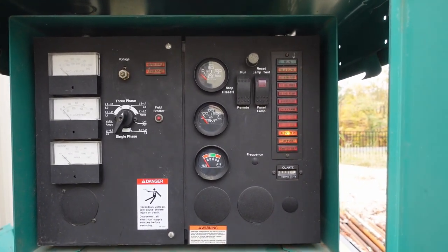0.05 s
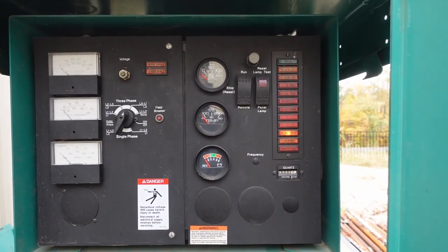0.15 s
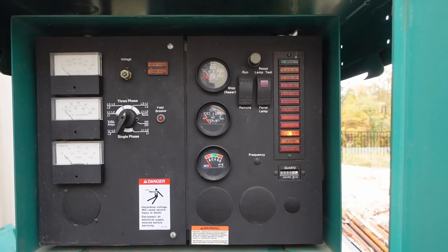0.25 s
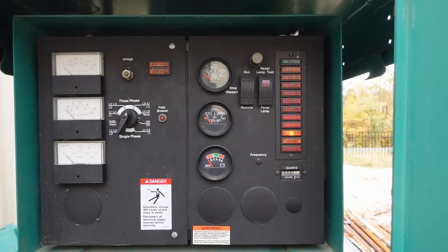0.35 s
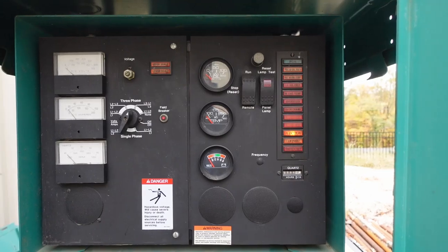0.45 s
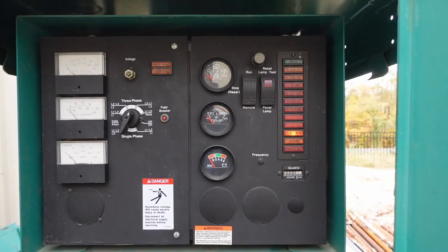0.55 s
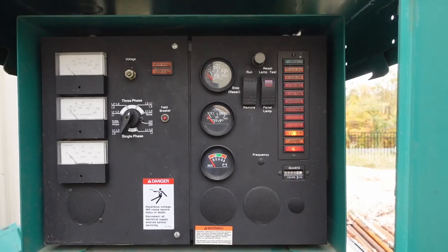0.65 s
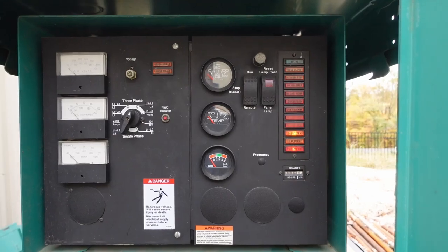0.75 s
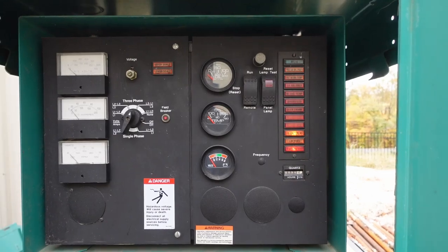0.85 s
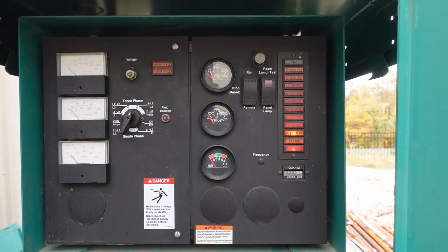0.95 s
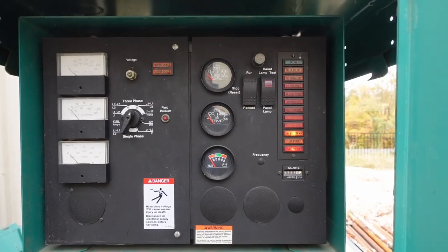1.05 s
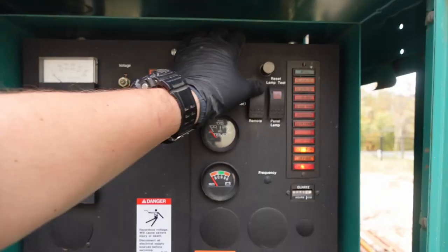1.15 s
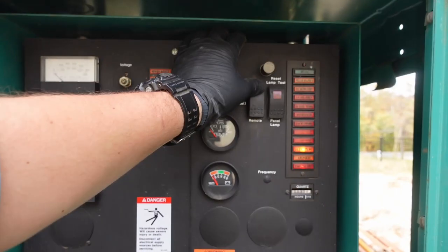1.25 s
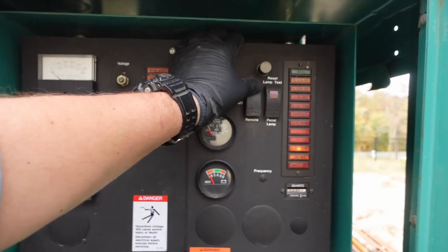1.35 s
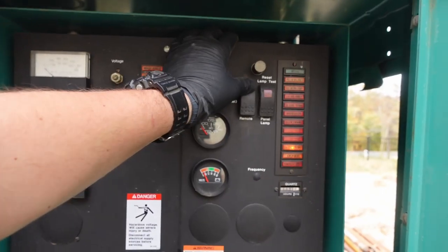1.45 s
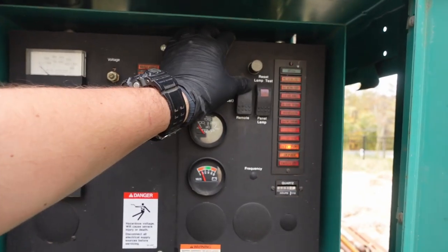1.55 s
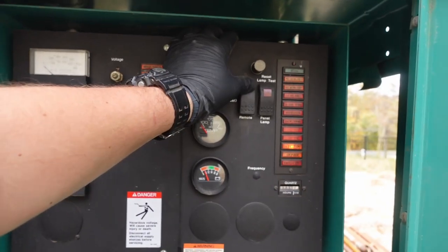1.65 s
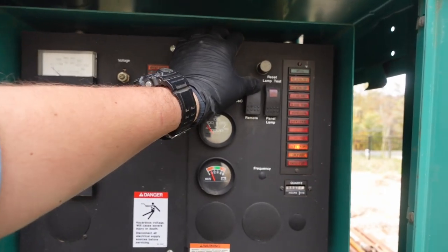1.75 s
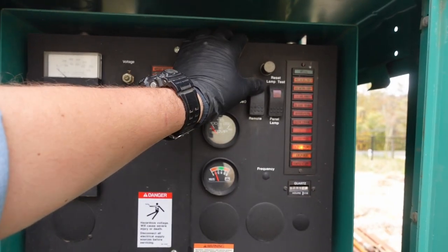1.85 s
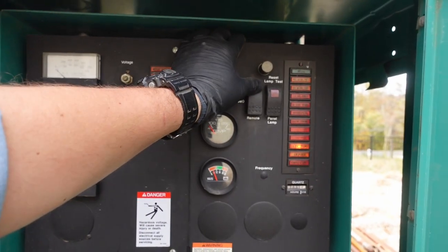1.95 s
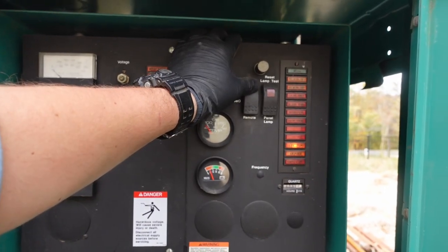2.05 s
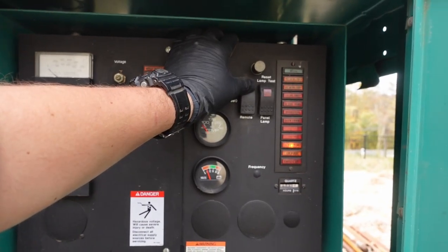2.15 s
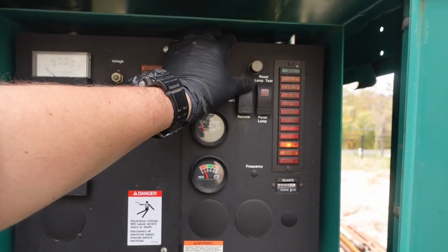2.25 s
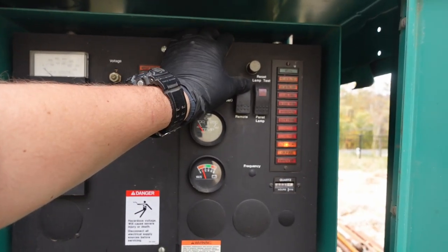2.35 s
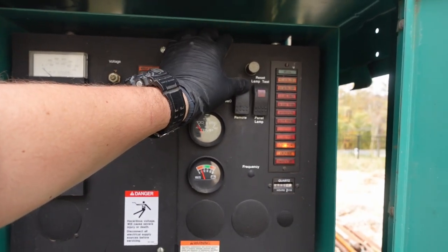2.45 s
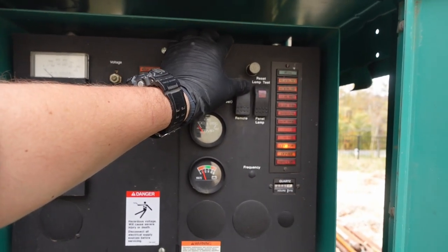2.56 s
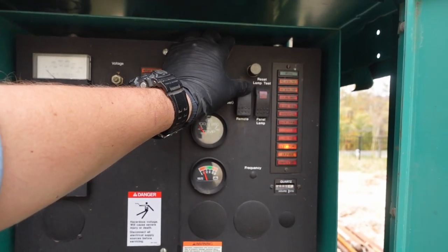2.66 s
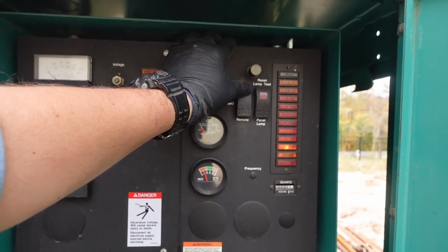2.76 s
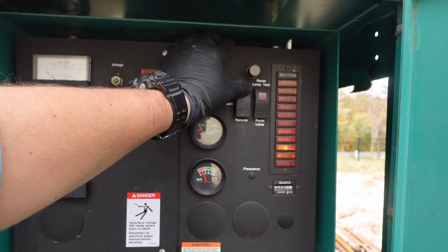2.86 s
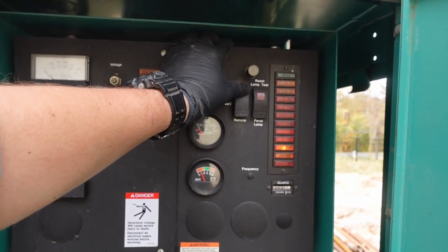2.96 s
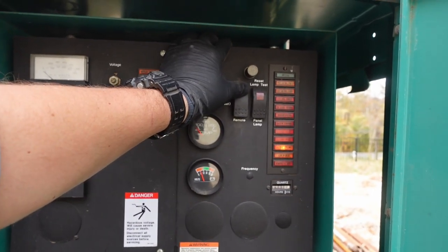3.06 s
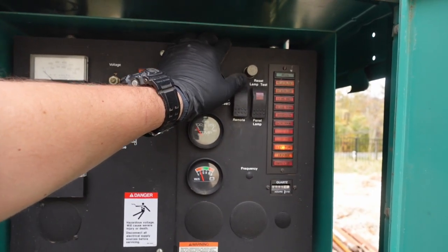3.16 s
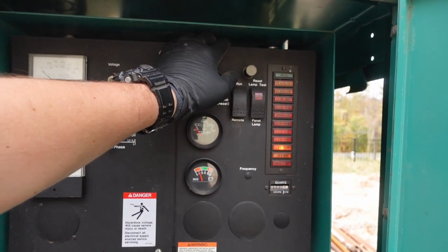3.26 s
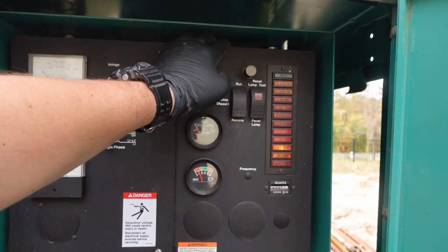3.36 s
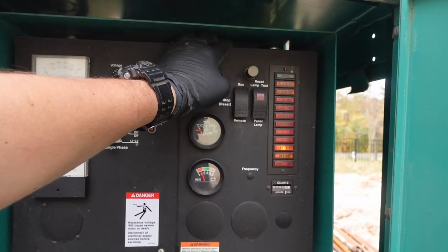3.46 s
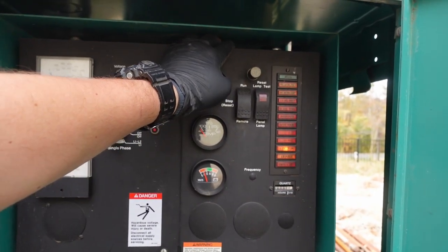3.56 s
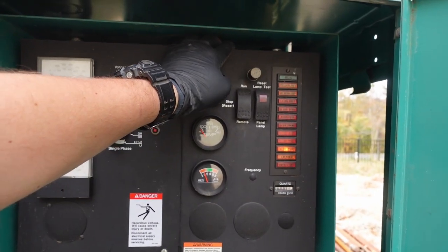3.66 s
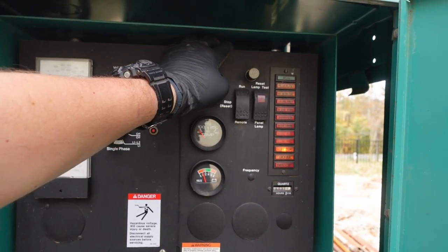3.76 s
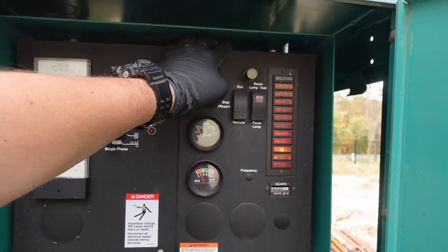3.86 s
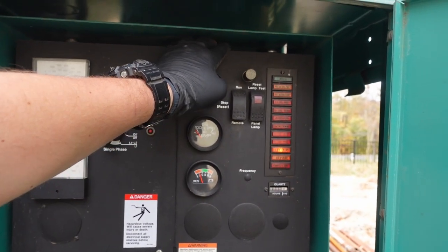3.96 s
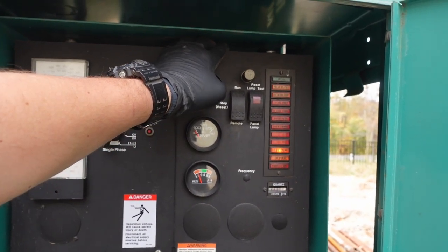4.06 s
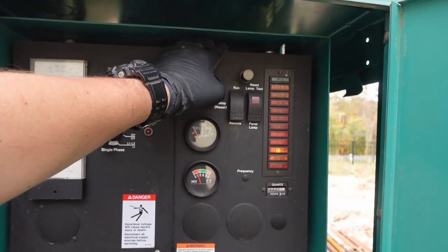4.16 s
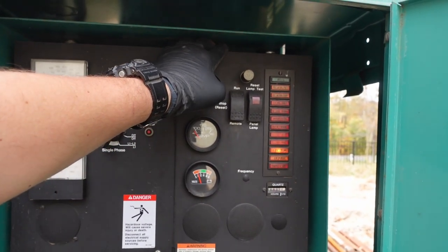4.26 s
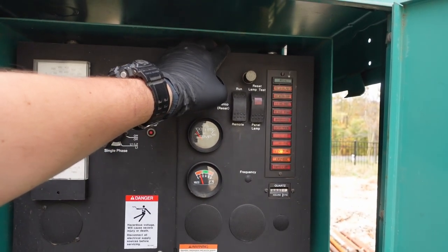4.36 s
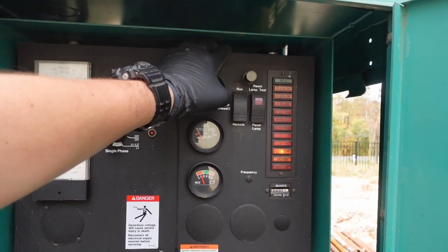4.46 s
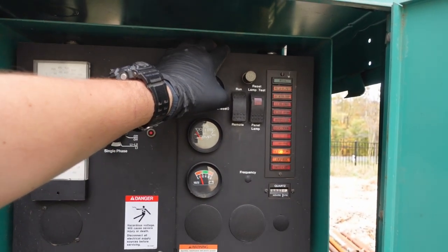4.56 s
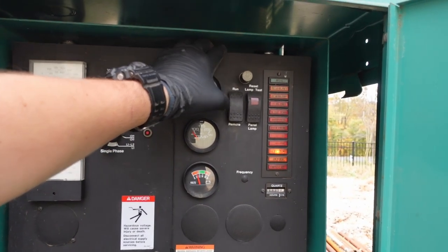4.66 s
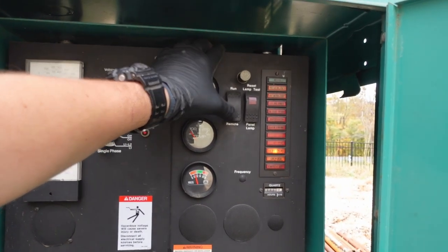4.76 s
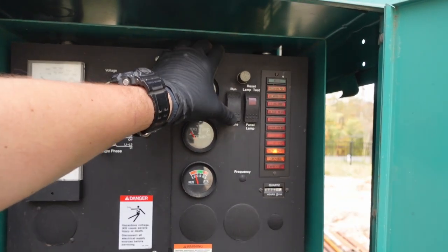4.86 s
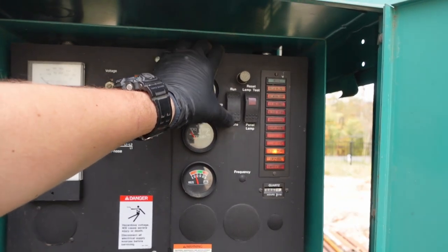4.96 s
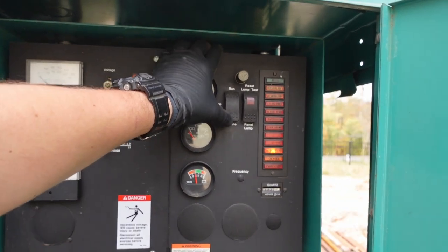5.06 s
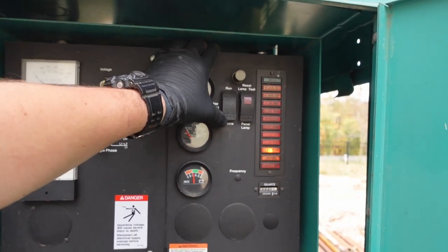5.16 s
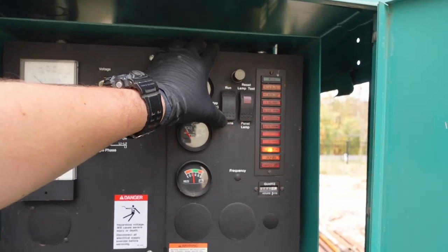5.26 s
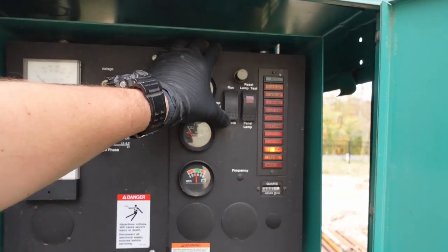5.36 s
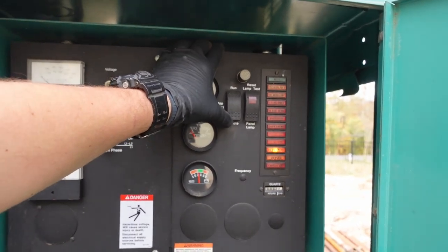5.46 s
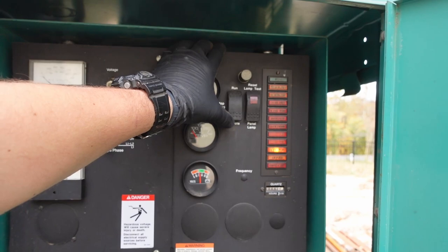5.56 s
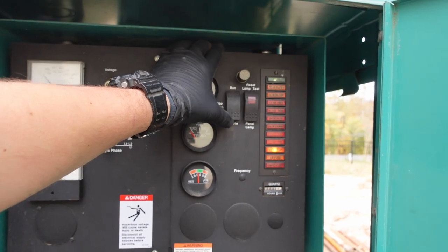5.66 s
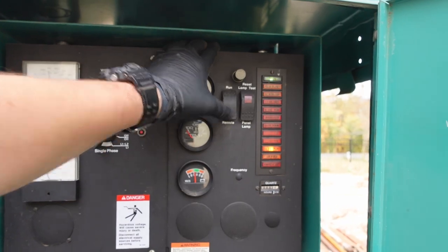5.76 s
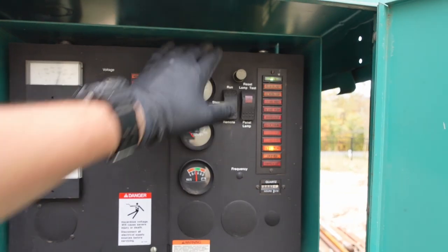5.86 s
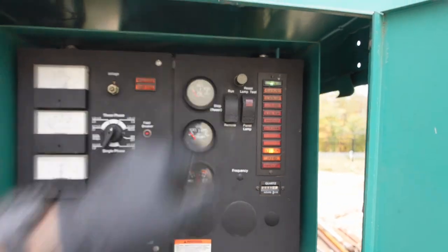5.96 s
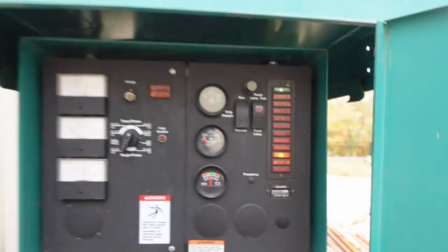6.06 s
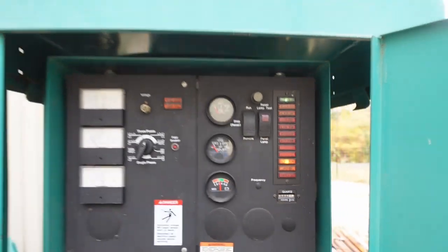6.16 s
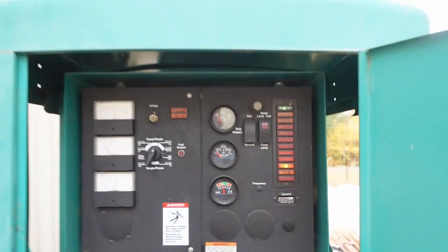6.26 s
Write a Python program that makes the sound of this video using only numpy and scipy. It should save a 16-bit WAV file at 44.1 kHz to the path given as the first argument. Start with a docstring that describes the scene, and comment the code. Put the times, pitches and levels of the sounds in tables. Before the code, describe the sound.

A relay clicks, a starter slams in and grinds with a pulsing metallic churn, then a diesel generator engine catches and revs up loudly.

```python
"""The geared starter of a standby generator grinds outdoors, close at the open control panel.
A relay clicks, then the pinion slams in; noise bursts at the tooth rate ring the steel housing,
hardest under each compression. The engine outruns the starter, whose freewheel chatters and drops out.
Firing-rate noise and tones make exhaust, clatter, injectors and fan as the engine runs up.
Shaped noise gives a wash like distant traffic, stepping at once to a louder, duller one before the start."""
import sys
import numpy as np
from scipy import signal
from scipy.fft import rfft, irfft
from scipy.io import wavfile

SR = 44100
rng = np.random.default_rng(int(sys.argv[2]) if len(sys.argv) > 2 else 0)


def dump_mix(stems):
    """Bounce the given channels to the path in sys.argv[1] as a 16-bit WAV at rate SR."""
    frames = np.atleast_2d(stems).T  # one column per channel
    limited = np.clip(frames, -1, 1)  # hard clip at full scale
    pcm = np.round(limited * 32767).astype(np.int16)
    wavfile.write(sys.argv[1], SR, pcm)


N = 278659
T = np.arange(N) / SR  # time of each sample, s
FILTER_HZ = np.fft.rfftfreq(8192, 1 / SR)

# starter speed, from heaving and cranking to racing and coasting: time_s, armature_turns_per_s
STARTER_SPEED = [(1.335, 60), (1.41, 120), (1.55, 125), (1.69, 144), (1.83, 165), (2.13, 202), (4.45, 209),
                 (4.65, 250), (5.03, 281), (6.32, 183)]
# starter and flywheel housing modes: mode_hz, width_hz, level_db
HOUSING_MODES = [(270.5, 28, -7), (940, 17.4, -8), (1028, 26.6, -1), (1125, 19.6, 0.5), (1226, 22, -3),
                 (1252, 11, -2), (1390, 14, -20), (2185, 73, -5)]
# steel enclosure resonances: centre_hz, width_hz, lift_db
PANEL_RESONANCES = [(120, 14, 3.5), (208, 48, 6), (271.3, 23.6, 10), (449.6, 39, 7.5), (538, 9.5, 8.5),
                    (616.3, 7.4, 9), (794, 25, 3.5), (1579, 6.7, 6.5), (1638, 11.5, 9.5), (1860, 31, -4),
                    (1905, 26, 8), (3297, 104, 5.5), (4370, 35, 7), (5060, 80, 5), (6350, 21, 9.5),
                    (6530, 50, -2), (9360, 170, 6)]
# spectrum of the gears grinding under load: frequency_hz, density_db_per_hz
GRIND_SPECTRUM = [(25, -74), (55, -45), (90, -23), (160, -8), (400, -3.5), (750, -1.5), (1150, 3.5),
                  (1500, -3), (2400, -4.5), (3600, -9.5), (6500, -18.5), (9500, -25.5), (11500, -33),
                  (16000, -48)]
# spectrum of the gear rattle: frequency_hz, density_db_per_hz
RATTLE_SPECTRUM = [(25, -53), (50, -20), (80, -14.5), (130, -2.5), (270, -1), (800, 2), (1300, 2.5),
                   (1700, -7), (2400, -3.5), (3600, -10), (6500, -15), (9500, -26), (11500, -30),
                   (16000, -45)]
# whine of the loaded reduction gears: multiple_of_tooth_rate, level_against_torque_db
GEAR_WHINE = [(1.05, -11), (4.15, -2), (7.85, -8.5)]
# overtones of the racing armature: multiple_of_turning_rate, level_against_hum_db
ARMATURE_OVERTONES = [(2, -2), (3, 3.5), (8.3, -2.5)]
# spectrum of the slipping freewheel: frequency_hz, density_db_per_hz
SLIP_SPECTRUM = [(200, -37), (700, 9), (1600, -1), (2300, 3.5), (3500, -5.5), (4800, -3), (6600, -4.5),
                 (7600, -10.5), (9600, -12.5), (11500, -22.5), (16000, -33)]
# engine speed: time_s, firings_per_s
ENGINE_SPEED = [(4.8, 16.4), (5.1, 31.1), (5.3, 49.5), (5.5, 65.6), (5.6, 70.7), (5.8, 76.6), (6.0, 80),
                (6.32, 83.4)]
# low engine orders: multiple_of_firing_rate, level_against_exhaust_db
ENGINE_ORDERS = [(1, -24.5), (2, -12.5), (2.5, -15), (3, -28), (4, -17), (5, -16), (5.5, -12), (6.5, -19)]
# spectrum of the exhaust puffs: frequency_hz, density_db_per_hz
EXHAUST_SPECTRUM = [(25, -43), (55, -29), (75, -23), (105, -7), (165, 0), (240, 5), (320, 1), (430, 2),
                    (600, -1), (1000, -14.5), (1500, -23), (4000, -51)]
# spectrum of the engine knock: frequency_hz, density_db_per_hz
CLATTER_SPECTRUM = [(200, -19), (700, 4), (1200, 3.5), (1600, -1), (2300, -3.5), (4000, -13), (6000, -14),
                    (8000, -16.5), (11000, -29), (16000, -50)]
# spectrum of the injector ticks: frequency_hz, density_db_per_hz
INJECTOR_SPECTRUM = [(2000, -40), (4500, -3), (5800, 1.5), (7500, -5), (8700, -4), (9600, -6.5),
                     (10300, -15), (16000, -28)]
# ring of the injectors and fuel lines: centre_hz, width_hz, lift_db
FUEL_LINE_RESONANCES = [(5850, 300, 0.5), (7380, 246, 4.5), (8600, 200, 8), (9450, 200, 2)]
# switchgear and pinion blows: start_s, level_db, ring_t60_s, low_thud_share_db
SWITCH_BLOWS = [(.622, -52, .07, -30), (1.2959, -24, 0.028, -20), (1.3, -44.5, 0.24, -10),
                (1.328, -26.5, 0.16, -10), (1.345, -20.5, 0.14, 5.5), (1.365, -27, 0.1, 19.5)]
# spectrum of the sharp metal contacts: frequency_hz, density_db_per_hz
CLACK_SPECTRUM = [(150, -15), (600, -5), (1900, -5.5), (2600, 0), (3400, -5), (4500, -5.5), (6200, -8),
                  (10000, -15), (16000, -33)]
# ring of the relay and solenoid: centre_hz, width_hz, lift_db
CONTACT_RESONANCES = [(1900, 140, 9), (3410, 160, 8.5), (5760, 450, 5), (9000, 390, 4.5)]
# spectrum of the heavy blows: frequency_hz, density_db_per_hz
THUD_SPECTRUM = [(40, -41), (100, -14), (250, -1.5), (700, -0.5), (1050, 10), (1500, 0), (3000, -5),
                 (9000, -45)]
# spectrum of the yard wash at first: frequency_hz, density_db_per_hz
YARD_SPECTRUM = [(25, -32), (60, -18), (100, -13), (125, -1.5), (190, -10.5), (400, -12), (600, -7.5),
                 (850, -2.5), (1300, -4.5), (1800, -12), (3000, -28), (4500, -33.5), (8000, -39),
                 (15000, -45)]
# spectrum of the second, louder and duller wash: frequency_hz, density_db_per_hz
SECOND_WASH_SPECTRUM = [(25, -37), (100, -17), (180, -16), (310, -20), (520, -10), (750, -13), (1100, -11),
                        (1700, -24), (2600, -33), (6000, -46), (15000, -57)]

# the starter engages, is outrun by the engine, drops out and winds down
ENGAGE_S, OUTRUN_S, DROP_OUT_S, COAST_S = 1.335, 4.347, 5.035, 5.18
INRUSH_S = 0.48  # decay time of the surge of starting torque
# compression strokes: the gap settles as the flywheel gathers speed, then creeps shorter
FIRST_STROKE_S, STROKE_GAP_S, CREEP_S = 1.8035, .1396, .00034
SLOW_START_S, SETTLE_STROKES = .023, 1.2
STROKE_DB, FIRST_STROKE_DB, LOADED_SHARE = -17.5, -20.5, .525
SAG_SHARE = .14  # share of its speed the starter loses per unit of sag
TEETH_PER_TURN = 2.25  # tooth impacts per armature turn
# starter layers: cranking_db, surge_db, free_db, coast_db_per_s
GEAR_LEVELS = (-28.5, 3.5, -2, 14)
BELL_LEVELS = (-29.5, 9.5, 6, 15.5)
ARMATURE_LEVELS = (-40, -13, 2, 30)
# the first slow compression swells the ring and rattle: centre_s, half_length_s, ring_lift_db, rattle_lift_db
HEAVE = (1.665, 0.081, 8.9, 2.9)
# the hum swells as it passes a panel resonance: centre_hz, width_hz, lift_db
HUM_PANEL = (274, 20.5, 13.1)
# the pinion squeals as it takes up the load: centre_s, half_length_s, level_db
SQUEAL = (1.41, 0.016, -21)
SHRIEK_DB, SHRIEK_PER_TURN, SHRIEK_END_S = -33.5, 17.6, 1.906
# the freewheel chatters louder the longer it is outrun
SLIP_DB, SLIP_DB_PER_S, SLIP_RELEASE_S = -32, 12, 0.039
FULL_RATE = 82  # firings per s at which the engine levels below are given
# engine layers: level_at_full_rate_db, rise_db_per_extra_firing_per_s
EXHAUST_LAW, CLATTER_LAW = (-14.5, 0.16), (-27, 0.18)
TICK_LAW, FAN_LAW = (-38, 0.14), (-12.5, 0.74)
FIRST_FIRE_DB, FIRST_FIRE_S = -32, 5.02  # the first firings knock hard in the cold cylinders
# the microphone backs out of the panel recess and hears more treble and clatter: start_s, length_s, lift_db
BACK_OUT = (6.15, .15, 3.2)
YARD_DB, SECOND_WASH_DB = -55, -49.5
EDGE_HZ = 15900  # upper band limit of the recorder


def starter():
    """Gear teeth knock the housing and enclosure, hardest and slowest under compression."""
    spin = curves(STARTER_SPEED)[0]
    torque, sag = load()
    heave_s, half_length, ring_lift_db, rattle_lift_db = HEAVE
    heave = swell(heave_s, half_length)
    rattle_db = starter_level(*GEAR_LEVELS) + rattle_lift_db * heave
    ring_db = starter_level(*BELL_LEVELS) + ring_lift_db * heave
    tooth_rate = TEETH_PER_TURN * spin * (1 - SAG_SHARE * sag) * (1 + .006 * wander(60))
    teeth = np.cumsum(tooth_rate) / SR
    impacts = teeth + .2 * wander(200) + 1  # backlash lets each tooth land early or late
    rattle_noise = bursts(impacts, decay=0.54, uneven_db=2.5, bed=0.75)
    rattle = amp(rattle_db) * colour(rattle_noise, RATTLE_SPECTRUM, PANEL_RESONANCES)
    grind_noise = torque * bursts(impacts, decay=0.98, uneven_db=1.5, bed=0.54)
    grind = amp(-2.5) * colour(grind_noise, GRIND_SPECTRUM, PANEL_RESONANCES)
    bell = housing_bell()
    knocks = (amp(ring_db) + amp(-6.5) * torque) * bursts(impacts, decay=0.13, uneven_db=4.5, bed=0.52)
    ring = signal.oaconvolve(knocks, bell / np.linalg.norm(bell))[:N]
    whine = gear_whine(teeth, torque, sag)
    return fade_in(ENGAGE_S + .01, .03) * (enclosure(rattle + grind, t60=.08, wet_db=-11) + ring + whine)


def housing_bell():
    """The decaying modes with which the housing rings on between the blows."""
    t = T[:SR // 4]
    bell = 0
    for hz, width, db in HOUSING_MODES:
        bell = bell + amp(db) * np.exp(-np.pi * width * t) * np.cos(2 * np.pi * hz * t)
    band = signal.butter(2, [130, 2600], "bandpass", fs=SR, output="sos")
    return signal.sosfilt(band, bell)


def gear_whine(teeth, torque, sag):
    """Loaded reduction gears whine at multiples of the tooth rate, falling in pitch as the sag grows."""
    whine = 0
    for multiple, db in GEAR_WHINE:
        flutter = 1 + .45 * wander(90)
        whine = whine + amp(db) * flutter * np.sin(2 * np.pi * multiple * teeth + .6 * wander(80))
    return whine * torque * np.exp(-sag)


def load():
    """Torque on the starter: it bites at each compression and eases past top dead centre."""
    torque, sag = np.zeros(N), np.zeros(N)
    for start_s, force_db, held_s in strokes():
        age = np.maximum(T - start_s, 0)
        grip = np.minimum(age / .014, 1) * np.exp(-np.maximum(age - held_s, 0) / .017)
        torque += amp(force_db) * grip * np.exp(-age / 0.34)
        sag += grip * (1 - np.exp(-age / .04))  # the motor slows as the air is squeezed
    return torque, sag


def strokes(count=19):
    """Start time, force and time under load of each compression; the first is softer."""
    k = np.arange(count)
    gaps = STROKE_GAP_S - CREEP_S * k + SLOW_START_S * np.exp(-k / SETTLE_STROKES)
    starts = FIRST_STROKE_S + np.cumsum(gaps) - gaps
    forces_db = np.where(k == 0, FIRST_STROKE_DB, STROKE_DB)
    return zip(starts, forces_db, LOADED_SHARE * gaps)


def starter_level(cranking_db, surge_db, free_db, coast_db_per_s):
    """Level in dB of a starter layer: surge, steady cranking, free run, coasting."""
    surge = np.exp(-np.maximum(T - ENGAGE_S, 0) / INRUSH_S)
    free = fade_in(OUTRUN_S, DROP_OUT_S - OUTRUN_S)
    return cranking_db + surge_db * surge + free_db * free - coast_db_per_s * np.maximum(T - COAST_S, 0)


def armature():
    """The armature hums at its turning rate, with thin overtones while it races free."""
    spin = curves(STARTER_SPEED)[0]
    turning_rate = spin * (1 - .04 * load()[1]) * (1 + .002 * wander(20))
    angle = 2 * np.pi * np.cumsum(turning_rate) / SR
    racing = fade_in(OUTRUN_S, 0.32) * (1 - fade_in(DROP_OUT_S - .2, .3))
    overtones = sum(amp(db) * np.sin(k * angle + .1 * k * wander(50)) for k, db in ARMATURE_OVERTONES)
    powered = amp(-6 * fade_in(DROP_OUT_S, .03))  # the hum weakens once the current is cut
    tones = powered * lift(spin, *HUM_PANEL) * np.sin(angle) + racing * overtones
    level_db = starter_level(*ARMATURE_LEVELS) + 1.1 * wander(20)
    return fade_in(ENGAGE_S, .1) * amp(level_db) * np.sqrt(2) * tones


def spin_up():
    """The starter shrieks as it gathers speed, and its first kick shakes the frame."""
    spin = curves(STARTER_SPEED)[0]
    squeal_s, half_length, squeal_db = SQUEAL
    level = amp(SHRIEK_DB) * (1 - fade_in(SHRIEK_END_S, .05)) + amp(squeal_db) * swell(squeal_s, half_length)
    pitch_hz = SHRIEK_PER_TURN * spin * (1 - SAG_SHARE * load()[1])
    shriek = level * amp(2.5 * wander(35)) * whistle(pitch_hz, width_hz=410)
    kick = amp(-37.5 - 59 * np.maximum(T - 1.37, 0))
    low_shudder = whistle(np.full(N, 78.), width_hz=19)
    high_shudder = amp(10.5) * whistle(np.full(N, 270.), width_hz=32)
    return fade_in(1.35, 0.044) * (shriek + kick * (low_shudder + high_shudder))


def clutch():
    """The rollers of the freewheel chatter until the pinion drops out."""
    release = np.exp(-np.maximum(T - DROP_OUT_S, 0) / SLIP_RELEASE_S)
    slipping = amp(SLIP_DB + SLIP_DB_PER_S * (T - OUTRUN_S)) * release
    rollers = np.cumsum(curves(STARTER_SPEED)[0]) / SR
    chatter = bursts(rollers, decay=0.68, uneven_db=3.5, bed=0.96)
    return fade_in(OUTRUN_S, 0.09) * slipping * colour(chatter, SLIP_SPECTRUM, PANEL_RESONANCES)


def engine():
    """Every firing gives an exhaust puff, a knock and an injector tick; the belt drives the fan."""
    rate = curves(ENGINE_SPEED)[0]
    firings = np.cumsum(rate * (1 + .005 * wander(15))) / SR
    lope = np.sin(2 * np.pi * firings / 6)  # the six cylinders are not alike
    near_sounds = clatter(rate, firings, lope) + injectors(rate, firings, lope)
    back_s, back_length, back_db = BACK_OUT
    near_sounds *= amp(back_db * fade_in(back_s, back_length))
    return fade_in(4.94, 0.13) * (exhaust(rate, firings) + fan(rate, firings) + near_sounds)


def exhaust(rate, firings):
    """A noise puff at each firing, with engine-order tones that strengthen with speed."""
    puffs = colour(bursts(firings, decay=0.76, uneven_db=2.0, bed=0.68), EXHAUST_SPECTRUM)
    orders = 0
    for multiple, db in ENGINE_ORDERS:
        tone = np.sin(2 * np.pi * (multiple * firings + rng.random()))
        orders = orders + amp(db + 3.5 * wander(14.0)) * np.sqrt(2) * tone
    tones = orders * np.clip(rate / 72, 0, 1) ** 2
    return amp(engine_level(rate, *EXHAUST_LAW)) * (amp(-2) * puffs + tones)


def clatter(rate, firings, lope):
    """Combustion knocks the engine at each firing, unevenly from cylinder to cylinder."""
    knock = amp(engine_level(rate, *CLATTER_LAW) + 4.5 + 0.8 * lope)
    knock = knock + amp(FIRST_FIRE_DB) * swell(FIRST_FIRE_S, 0.056)
    return knock * colour(bursts(firings, decay=0.99, uneven_db=1.5, bed=1.0), CLATTER_SPECTRUM)


def injectors(rate, firings, lope):
    """Injector ticks ring the fuel lines; a thin whistle climbs with the speed."""
    tick_noise = bursts(firings + .4, decay=.28, uneven_db=3.4, bed=.52)
    ticks = colour(tick_noise, INJECTOR_SPECTRUM, FUEL_LINE_RESONANCES)
    pitch_hz = 7400 + 26.2 * rate + 180 * wander(20)
    singing = amp(-10.0 + 3.8 * wander(35)) * whistle(pitch_hz, width_hz=350)
    level_db = engine_level(rate, *TICK_LAW) + 1.2 + 1.3 * lope + 0.92 * wander(25)
    return amp(level_db) * (ticks + singing)


def fan(rate, firings):
    """The belt-driven fan hums at its blade rate, 3.75 blades per firing."""
    blades = np.sin(2 * np.pi * 3.75 * firings + 0.37 * wander(30))
    return amp(engine_level(rate, *FAN_LAW) - 6.0 + 2.6 * wander(27)) * np.sqrt(2) * blades


def engine_level(rate, full_db, db_per_rate):
    """Level in dB of an engine layer at a firing rate."""
    return full_db + db_per_rate * (rate - FULL_RATE)


def blows():
    """Metal contacts clack; the heavy ones also thud through the enclosure."""
    sharp, heavy = np.zeros(N), np.zeros(N)
    for start_s, db, t60, thud_db in SWITCH_BLOWS:
        strike = fade_in(start_s, 0.0011) * amp(db - 60 * np.maximum(T - start_s, 0) / t60)
        sharp += strike
        heavy += amp(thud_db) * strike
    sharp_noise, heavy_noise = rng.standard_normal((2, N))
    clack = colour(sharp * sharp_noise, CLACK_SPECTRUM, CONTACT_RESONANCES)
    thud = colour(heavy * heavy_noise, THUD_SPECTRUM, PANEL_RESONANCES)
    return amp(-1.0) * (clack + thud)


def outdoors():
    """A distant wash like traffic; it steps at once to a louder, duller wash just before the start."""
    far_noise, second_noise = rng.standard_normal((2, N))
    switched = fade_in(1.12, 0.0074)
    far_wash = amp(YARD_DB + .4 * wander(4)) * colour(far_noise, YARD_SPECTRUM, [(807, 17, 6.8)])
    second_wash = amp(SECOND_WASH_DB) * colour(second_noise, SECOND_WASH_SPECTRUM)
    return (1 - switched) * far_wash + switched * second_wash


def enclosure(x, t60, wet_db):
    """Short dense reflections between the steel walls."""
    t = T[:SR // 4]
    signs = rng.choice([-1., 1.], len(t))
    present = rng.random(len(t)) < 2000 / SR  # about 2000 reflections per s
    taps = signs * present * (t > .002) * amp(-60 * t / t60)
    wet = signal.oaconvolve(x, taps / np.linalg.norm(taps))[:N]
    return (x + amp(wet_db) * wet) / np.sqrt(1 + amp(wet_db) ** 2)


def bursts(turns, decay, uneven_db, bed):
    """One puff of noise each cycle, of uneven strength, over a steady bed."""
    strength = amp(uneven_db * rng.standard_normal(N))[turns.astype(int)]
    envelope = bed + strength * np.exp(-(turns % 1) / decay)
    return unit(envelope * rng.standard_normal(N))


def whistle(hz, width_hz):
    """A narrow fuzzy tone of rms about 1 that follows a pitch curve."""
    angle = 2 * np.pi * np.cumsum(hz) / SR
    return wander(width_hz / 2) * np.sin(angle) + wander(width_hz / 2) * np.cos(angle)


def colour(x, spectrum, resonances=()):
    """A causal filter of unit energy: a broad spectrum lifted by resonances."""
    hz, db = np.transpose(spectrum)
    gain = amp(np.interp(np.log(FILTER_HZ + 1), np.log(hz), db))
    for resonance in resonances:
        gain = gain * lift(FILTER_HZ, *resonance)
    # minimum phase, so the ring follows the blow
    log_gain = np.log(np.r_[gain, gain[-2:0:-1]])
    response = np.exp(np.conj(signal.hilbert(log_gain)))
    taps = np.fft.ifft(response).real[:len(FILTER_HZ)]
    return signal.oaconvolve(x, taps / np.linalg.norm(taps))[:N]


def lift(hz, centre_hz, width_hz, lift_db):
    """Gain of one resonance at the frequency hz."""
    detune = 2 * (hz - centre_hz) / width_hz
    return np.sqrt(1 + (amp(lift_db) ** 2 - 1) / (1 + detune ** 2))


def wander(hz):
    """Smooth chance of rms 1 that changes about hz times a second."""
    slowing = 1 + (np.fft.rfftfreq(N, 1 / SR) / hz) ** 4
    return unit(irfft(rfft(rng.standard_normal(N)) / slowing, N))


def swell(s, half_length):
    """A smooth bump of height 1 around time s."""
    return np.exp(-((T - s) / half_length) ** 2)


def fade_in(s, length):
    """A ramp from 0 at time s to 1."""
    return np.clip((T - s) / length, 0, 1)


def curves(rows):
    """Each column of a time table, at every sample."""
    s, *columns = np.transpose(rows)
    return [np.interp(T, s, column) for column in columns]


def unit(x):
    """Scales to rms 1."""
    return x / np.sqrt(np.mean(x ** 2) + 1e-20)


def amp(db):
    """Decibels to gain."""
    return 10 ** (np.asarray(db) / 20)


def scene():
    """The machine in its steel housing, and the yard around it."""
    machine = starter() + armature() + spin_up() + clutch() + engine() + blows()
    return (machine + outdoors())[None]


def record(dry):
    """The recorder cuts the deepest bass, rounds off the highest peaks and limits the band."""
    bass_cut = signal.butter(3, 48, "highpass", fs=SR, output="sos")
    lean = signal.sosfilt(bass_cut, dry)
    rounded = lean / (1 + (lean / .85) ** 8) ** (1 / 8)
    band_limit = signal.firwin(511, EDGE_HZ, window=("kaiser", 9), fs=SR)
    return signal.oaconvolve(rounded, band_limit[None], "same")


dry = scene()
out = record(dry)
dump_mix(out)
```